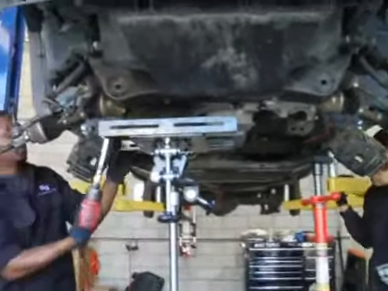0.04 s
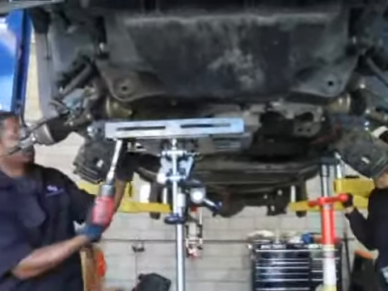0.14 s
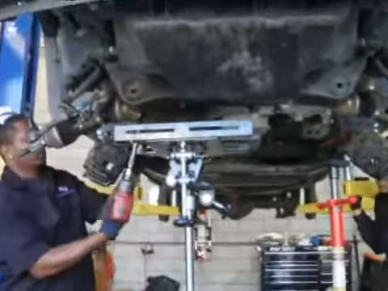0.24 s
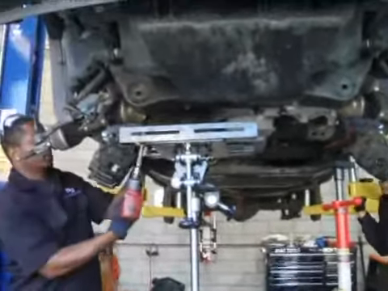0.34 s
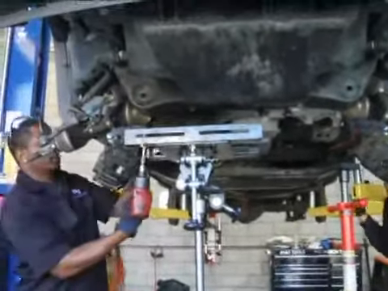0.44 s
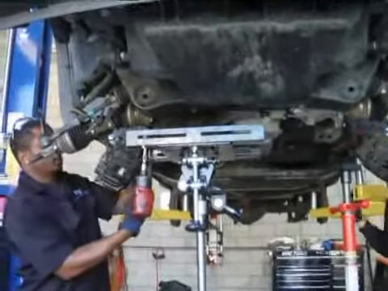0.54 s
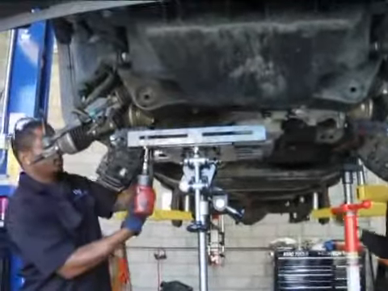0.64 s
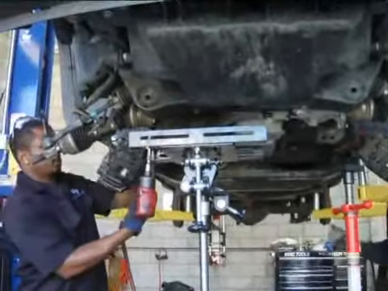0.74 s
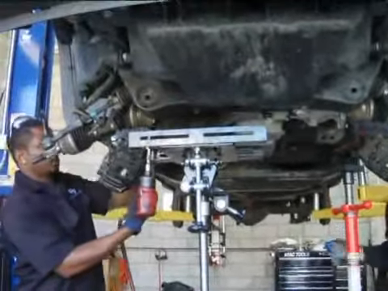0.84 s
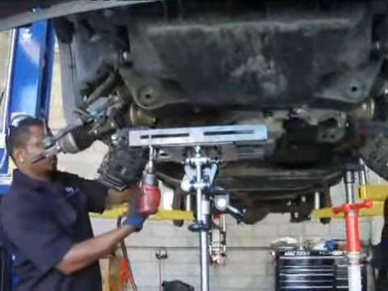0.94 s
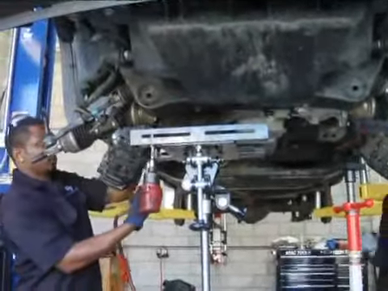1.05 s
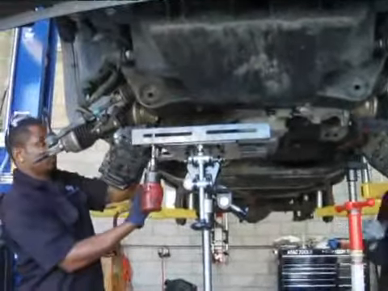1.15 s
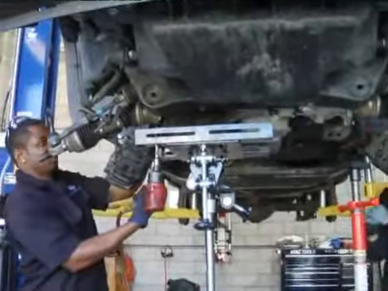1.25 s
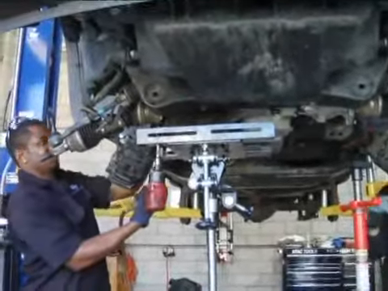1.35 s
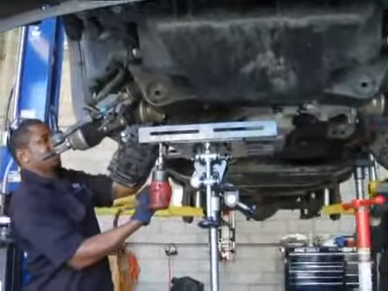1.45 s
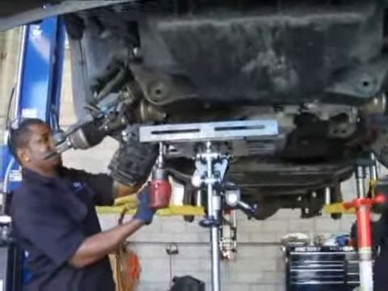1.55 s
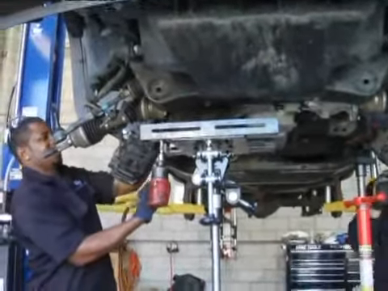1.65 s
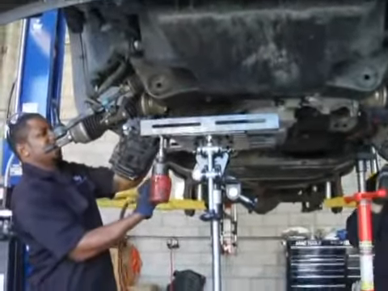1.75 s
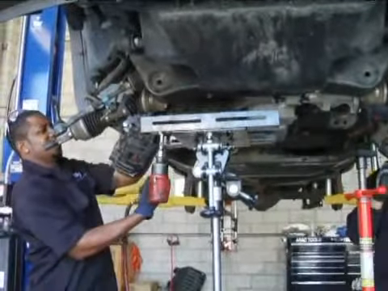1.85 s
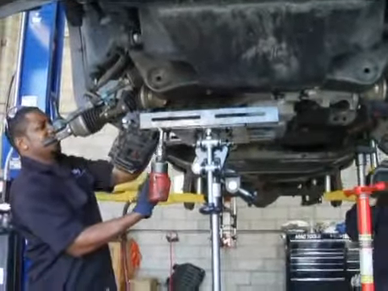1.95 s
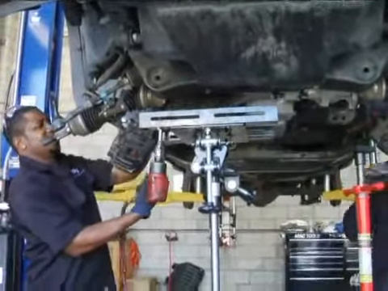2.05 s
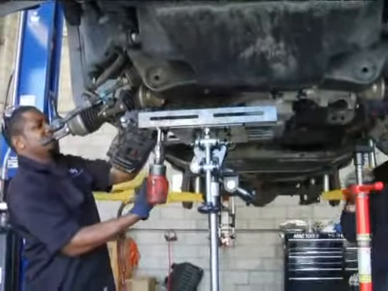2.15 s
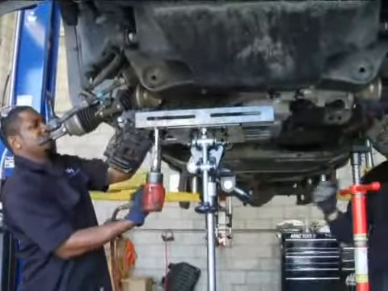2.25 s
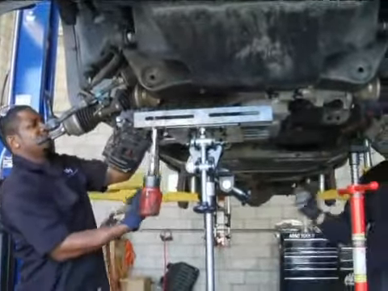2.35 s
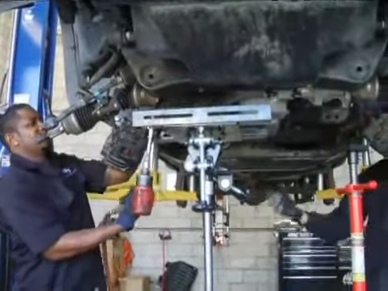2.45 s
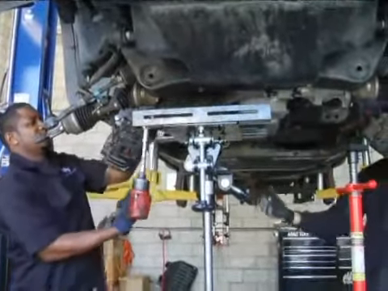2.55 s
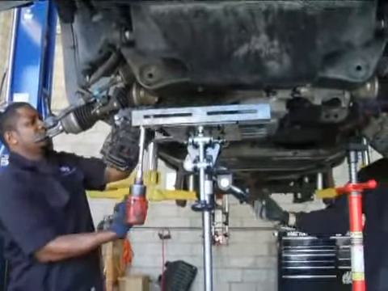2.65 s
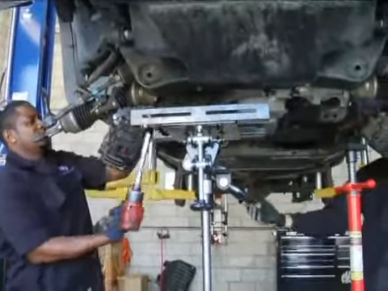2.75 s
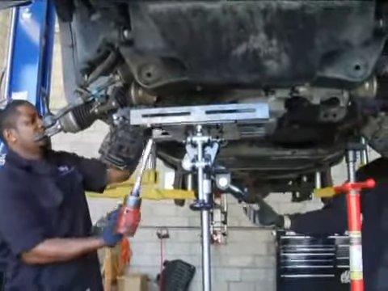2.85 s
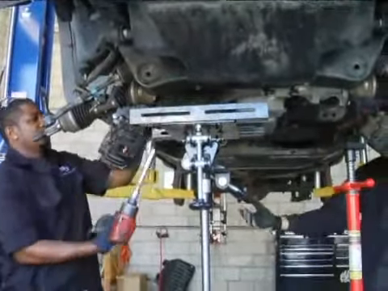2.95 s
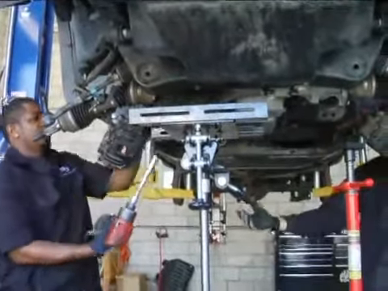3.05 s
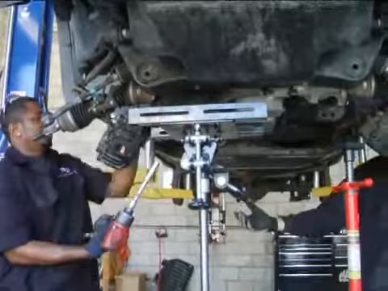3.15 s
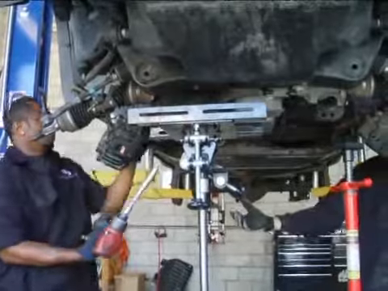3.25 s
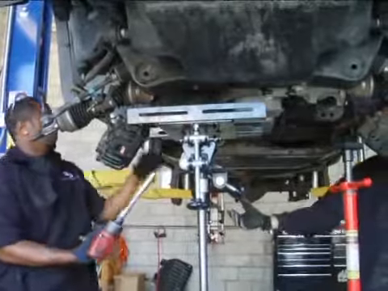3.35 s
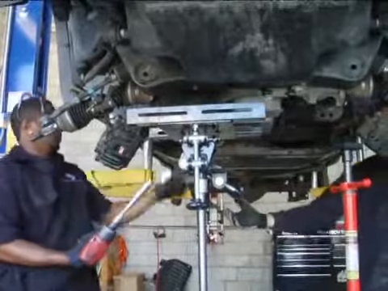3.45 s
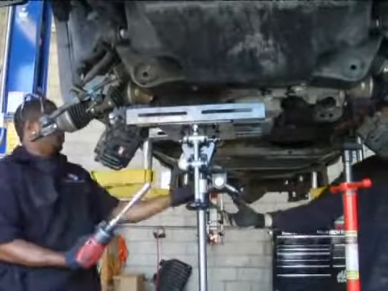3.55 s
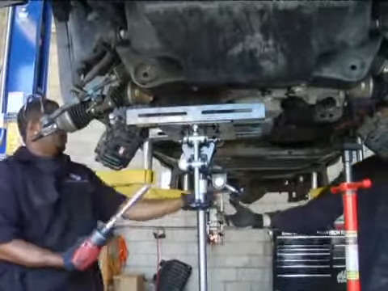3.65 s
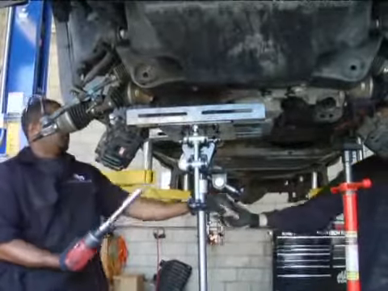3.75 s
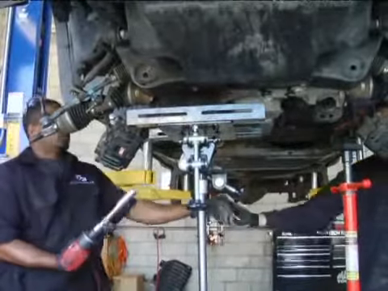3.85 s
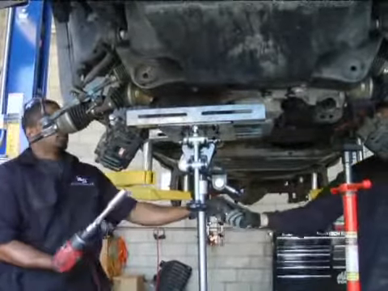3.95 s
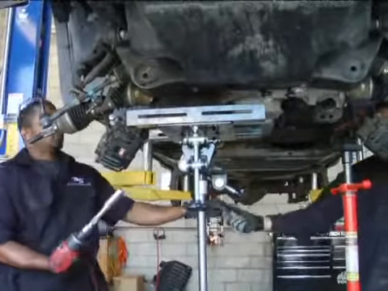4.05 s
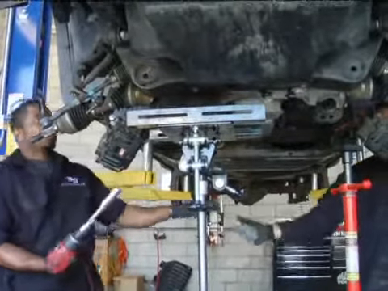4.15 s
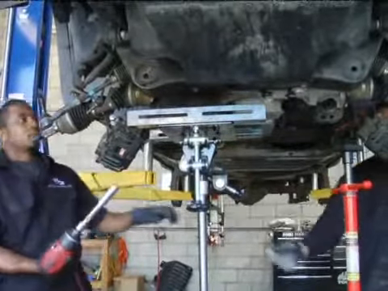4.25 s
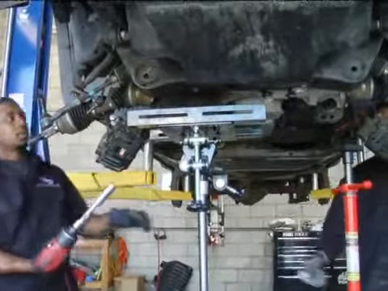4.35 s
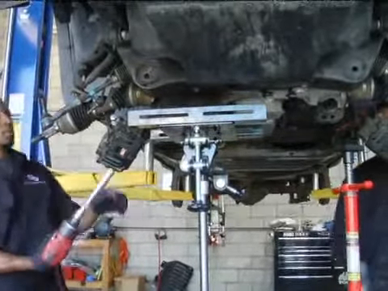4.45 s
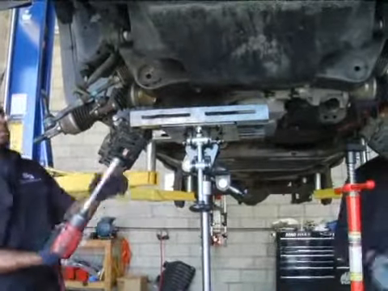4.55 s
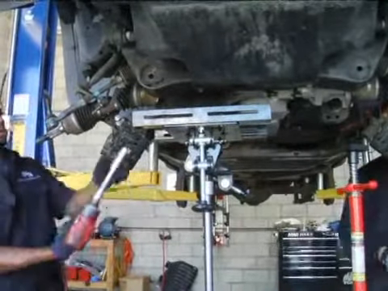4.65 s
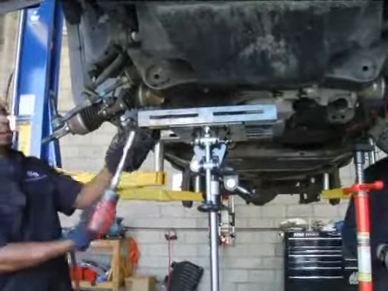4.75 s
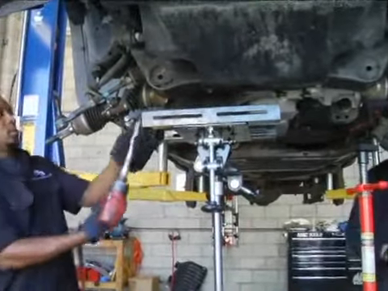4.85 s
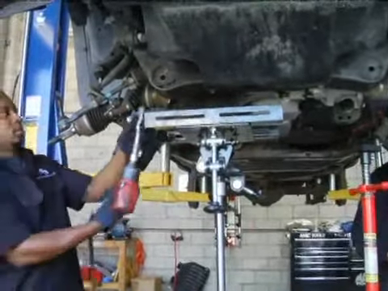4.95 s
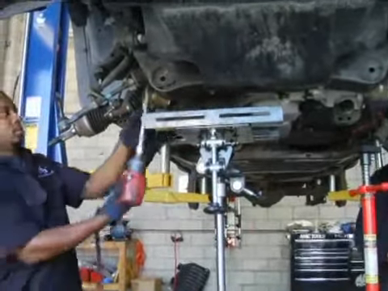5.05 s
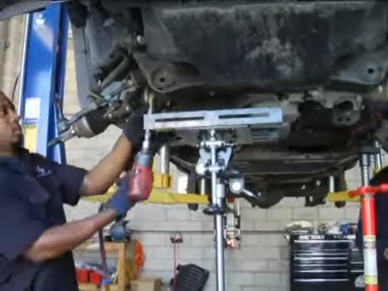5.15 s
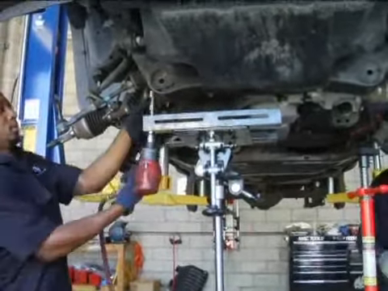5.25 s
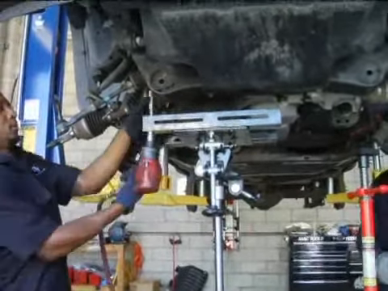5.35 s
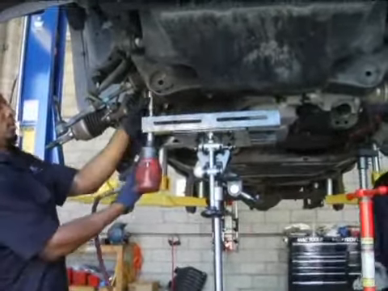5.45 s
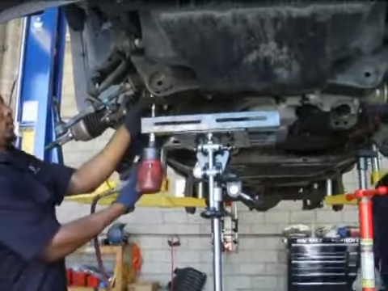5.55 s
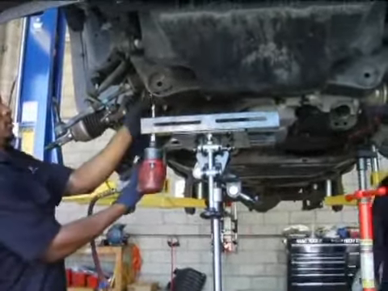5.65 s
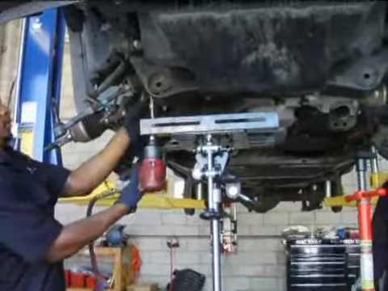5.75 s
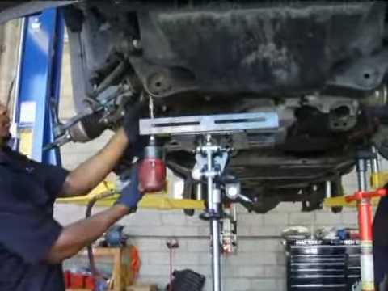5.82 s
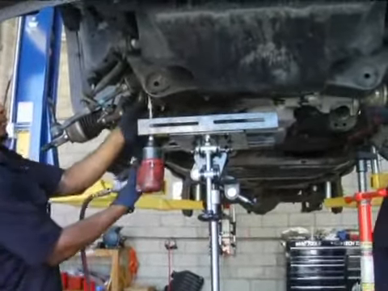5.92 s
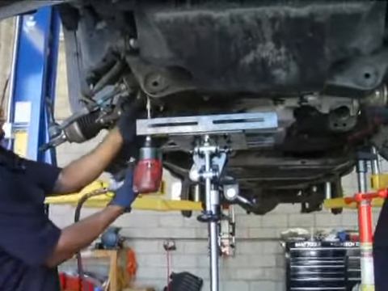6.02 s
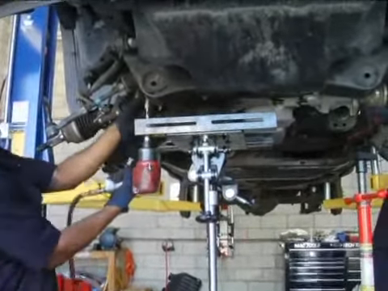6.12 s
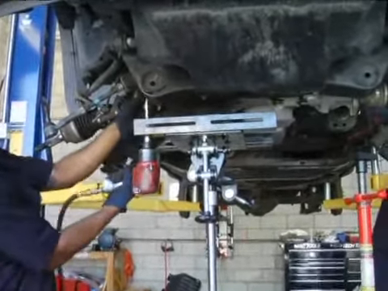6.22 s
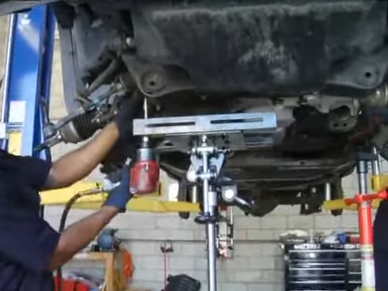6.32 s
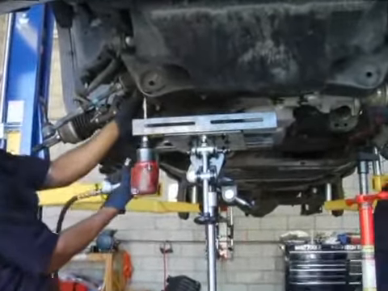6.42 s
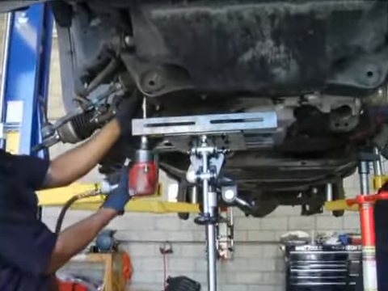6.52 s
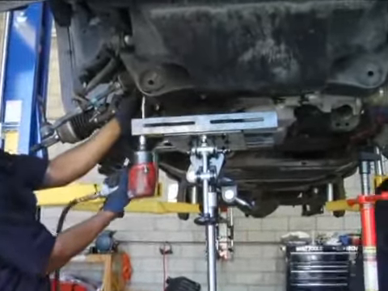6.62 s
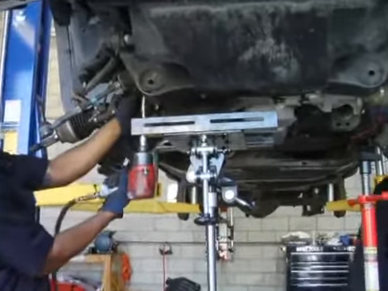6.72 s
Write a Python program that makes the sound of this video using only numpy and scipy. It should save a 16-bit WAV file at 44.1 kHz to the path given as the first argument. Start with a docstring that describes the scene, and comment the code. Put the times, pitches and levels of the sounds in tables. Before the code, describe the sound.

Over low fan hum in a brick workshop, knocks and rustling lead to an air impact wrench bursting, a ringing socket, then more bursts.

```python
"""Fans hum over a low rumble in a brick workshop, with knocks and rustling hands, before an air impact wrench
bursts in under a lifted car; after a pause full of knocks and rings it bursts in again.
The vane motor is a train of puffs with throbbing hiss and clatter; it stalls on hammer blows, and once spins
free and coasts down. Noise bursts and modes make the knocks, paired sines the ringing socket, gritty noise
the rustle. Echo tails place it all in a hall; the sound is practically mono."""
import sys
import numpy as np
from scipy import signal
from scipy.io import wavfile
from scipy.ndimage import uniform_filter1d

SR = 44100
rng = np.random.default_rng(int(sys.argv[2]) if len(sys.argv) > 2 else 0)


def output_pcm(signal):
    """Save a mono or channel-first signal as 16-bit PCM at the path in sys.argv[1].

    Samples are clipped to [-1, 1] before scaling.
    """
    pcm = np.clip(np.atleast_2d(signal).T, -1, 1) * 32767
    wavfile.write(sys.argv[1], SR, np.round(pcm).astype(np.int16))


N = 298998

# the bolt is loose and the rotor turns evenly:
# time_s, vanes passing the exhaust_hz, puff_db, ring of the exhaust passage_db
FREE_RUN = [(1.715, 346.7, -34, -38), (1.733, 401.6, -24.5, -21), (1.763, 496, -28, -48),
            (1.795, 542, -28, -25), (1.81, 495.4, -31, -42), (1.826, 451, -23, -30),
            (1.852, 384.5, -30, -35), (1.894, 286.8, -39, -30.5), (2.008, 155.4, -36, -49),
            (2.04, 141.5, -40, -36), (2.092, 115.1, -38.5, -37), (2.152, 98.16, -37.5, -50),
            (2.25, 66.3, -47.5, -51)]
# pulls of the trigger: touched_s, wide open_s, let go_s, end of coasting_s, hiss_db, hiss sag while held_db,
# hiss after letting go_db, clatter_db, clatter coasting_db, rumble_db, fade while coasting_db
TRIGGER_PULLS = [(1.356, 1.399, 1.545, 1.675, -25, -4, -32.5, -28, -33, -29.5, -5),
                 (1.643, 1.675, 1.81, 2.19, -28, -6.5, -42.5, -31, -33.5, -37, -7),
                 (6.09, 6.137, 6.26, 6.39, -22, -6.5, -33, -29, -31.5, -36, -5),
                 (6.374, 6.382, 6.51, 6.64, -29, -1, -34, -32, -29.5, -38, -9),
                 (6.573, 6.671, 6.8, 6.9, -31, 1.5, -31, -32, -28, -49, -7)]
# treble spectrum of a hard impact: pitch_hz, level_db
CRACK_COLOUR = [(2500, -28), (4000, 8.5), (6000, 10.5), (9000, 7), (13000, 5)]
# how long the hall rings in each band: pitch_hz, t60_s
HALL_DECAY = [(100, .8), (500, .7), (1500, .6), (3000, .5), (5000, .32), (12000, .22)]


def amp(db):
    """dB to gain."""
    return 10 ** (np.asarray(db) / 20)


def evened(x):
    """Scales to rms 1."""
    return x / np.sqrt(np.mean(x ** 2) + 1e-20)


def read(points, hz):
    """Reads a spectrum on a log frequency axis."""
    f, value = np.transpose(points)
    return np.interp(np.log(hz + 1), np.log(f + 1), value)


def curve(tables, index, silent=-120):
    """Joins one column of several tables over the whole length; outside them it stays at silent."""
    t, out = np.arange(N) / SR, np.full(N, float(silent))
    for rows in map(np.array, tables):
        inside = (t >= rows[0, 0]) & (t <= rows[-1, 0])
        out[inside] = np.interp(t[inside], rows[:, 0], rows[:, index])
    return out


def level(tables, index):
    """A dB column as gain, with edges softened over 3 ms."""
    return uniform_filter1d(amp(curve(tables, index)), size=130)


def colour(x, points):
    """Causal filter with the given spectrum (minimum phase)."""
    hz = abs(np.fft.fftfreq(8192, 1 / SR))
    log_gain = np.log(amp(np.maximum(read(points, hz), -100)))
    min_phase = -signal.hilbert(log_gain).imag
    taps = np.fft.ifft(np.exp(log_gain + 1j * min_phase)).real[:4096]
    return signal.oaconvolve(x, taps)[:len(x)]


def resonate(x, hz, width_hz):
    """A two-pole resonance of gain 1."""
    r = np.exp(-np.pi * width_hz / SR)
    poles = [2, -4 * r * np.cos(2 * np.pi * hz / SR), 2 * r * r]
    return signal.lfilter([1 - r * r, 0, r * r - 1], poles, x)


def resonate_twice(x, hz, width_hz):
    """Two equal resonances in a row, for steeper skirts."""
    return resonate(resonate(x, hz, width_hz), hz, width_hz)


def noise():
    """White noise over the whole length."""
    return rng.standard_normal(N)


def grit(spread_db, per_s):
    """Noise sprinkled with small clicks of uneven size."""
    sizes = amp(spread_db * np.minimum(rng.exponential(1, N), 3.5))
    clicks = sizes * (rng.random(N) < per_s / SR)
    return noise() * (.5 + evened(clicks))


def add(mix, s, sound):
    """Lays a sound into the mix at s seconds."""
    part = mix[round(s * SR):][:len(sound)]
    part += sound[:len(part)]


def scatter(x, t60s, start):
    """Echoes as sparse taps of random sign, each band dying at its own speed; start is in samples."""
    taps, at = np.zeros(SR), np.arange(start, SR - 20, 20)
    taps[at + rng.integers(0, 20, len(at))] = rng.choice([-1., 1.], len(at))
    hz, t, z = signal.stft(taps, SR, nperseg=256)
    decay = amp(-60 * t / read(t60s, hz)[:, None])
    tail = signal.istft(z * decay, SR, nperseg=256)[1]
    return signal.fftconvolve(x, tail / np.linalg.norm(tail))[:N]


def hall(x):
    """Echo of the hall: three random tails cross-fade in turn, nine cycles a second, for an even reverberation."""
    turn = 2 * np.pi * np.arange(N) / SR * 9
    shares = [np.sqrt(2 / 3) * np.cos(turn + k * np.pi / 3) for k in range(3)]
    return sum(scatter(x * share, HALL_DECAY, start=400) for share in shares)


def air():
    """Gains of hiss, clatter and shudder: valve opens, pressure sags, trigger let go, the coasting air dies away."""
    opening_db, let_go_s = -46.5, 0.0039  # start of the rise, time of the fall at letting go
    die_away_s, die_away_db = 0.075, -24  # fall after coasting
    shudder_db_per_s = -64  # the tool shakes the stand, less and less through a pull
    t, out = np.arange(N) / SR, np.zeros((3, N))
    for (touched, opened, let_go, coast_end, hiss_db, sag_db, after_db,
         clatter_db, coast_db, rumble_db, fade_db) in TRIGGER_PULLS:
        times = [touched, opened, let_go, let_go + let_go_s, coast_end, coast_end + die_away_s]

        def follow(open_db, held_db, released_db):
            coasted_db = released_db + fade_db
            points = [open_db + opening_db, open_db, held_db, released_db, coasted_db, coasted_db + die_away_db]
            return np.interp(t, times, points, -120, -120)

        hiss = follow(hiss_db, hiss_db + sag_db, after_db)
        clatter = follow(clatter_db, clatter_db, coast_db)
        held_rumble_db = rumble_db + shudder_db_per_s * (let_go - opened)
        shudder = np.interp(t, times[:4], [-120, rumble_db, held_rumble_db, -120])
        out = np.maximum(out, amp([hiss, clatter, shudder]))
    return out


def workshop():
    """Ventilation noise, wavering fan tones and a low rumble that swells when the tool shakes the stand."""
    # spectrum of the ventilation: pitch_hz, level_db
    vent_colour = [(8.8, -40), (15, -35), (36, -2), (60, -13.5), (103, -8), (149, -13), (186, -5.5),
                   (301, -15), (704, -20.5), (767, -22.5), (1140, -23), (1650, -31.5), (4690, -43),
                   (11900, -44), (13000, -57)]
    # fan tones: pitch_hz, width_hz, level_db
    fan_tones = [(86.6, 2.3, -60.5), (116, 6, -56), (184.14, 6.2, -49.5), (426, 5, -66),
                 (495.4, 6.1, -62.5), (710, 22, -58.5)]
    # low rumble of the hall: time_s, level_db
    rumble_level = [(0.0, -46.5), (0.34, -55), (1.19, -44.5), (1.26, -60), (2.21, -72), (2.79, -57),
                    (4.6, -79), (5.36, -52), (5.91, -50), (6.04, -77), (6.78, -62)]
    vents = amp(-48.5) * evened(colour(noise(), vent_colour))
    hum = sum(amp(db) * evened(resonate(noise(), f, w)) for f, w, db in fan_tones)
    rumble = evened(resonate_twice(noise(), 69, 62))
    shudder_gain = air()[2]
    return vents + hum + (amp(curve([rumble_level], index=1)) + shudder_gain) * rumble


def rustle():
    """Gritty friction of steel below, a soft swish of glove cloth above; each move sets in fast and fades."""
    # hand moves: peak_s, scrape_db, swish_db, fade_db_per_s
    moves = [(.186, -60.5, -59.5, -54), (.32, -52, -66, -94), (0.618, -66, -48.5, -400),
             (0.903, -48, -47.5, -240), (1.001, -32, -39, -230), (1.066, -34.5, -42.5, -110),
             (2.2, -36.5, -53, -46), (2.342, -38, -44, -130), (2.616, -34.5, -46, -270),
             (2.664, -47, -55, -39), (4.622, -50.5, -43.5, -160), (4.7, -50.5, -54.5, -69),
             (5.19, -45, -57.5, -170), (5.714, -42.5, -58, -200), (5.754, -40.5, -53, -140)]
    # spectrum of sliding steel: pitch_hz, level_db
    steel_colour = [(300, 10), (1000, 6.5), (2500, 3), (4000, -7), (6500, -54)]
    # spectrum of rubbing cloth: pitch_hz, level_db
    cloth_colour = [(2500, -14), (4500, 6.5), (6500, 9), (8000, -9), (11000, -0.5), (13000, -61)]
    grab_db_per_s = 816  # how fast a move sets in
    scrape, swish = grit(3, 3000), grit(2, 4000)
    s, scrape_db, swish_db, fade = np.transpose(moves)[:, :, None]
    since = np.arange(N) / SR - s
    shape_db = np.where(since < 0, grab_db_per_s, fade) * since
    steel = amp((scrape_db + shape_db).max(0))  # the loudest move wins
    cloth = amp((swish_db + shape_db).max(0))
    return steel * evened(colour(scrape, steel_colour)) + cloth * evened(colour(swish, cloth_colour))


def socket():
    """A tapped steel socket: close pairs of ring modes beat as they die, until a glove all but stops them."""
    # taps: start_s, level_db, upper modes_db, extra for the top mode_db,
    # damping by the glove_db_per_s (above 0 counts as none), gripped after_s
    taps = [(2.3444, -40, -8, -5, -100, 0.023), (2.614, -55.5, 6.5, 0, -50, 0.011),
            (2.6664, -34.5, -6.5, -13, -58, 0.08), (2.7715, -35.5, -11, -12, -96, 0.057),
            (2.937, -43, -24, -5, -200, 0.093), (3.012, -60, -20, -2, 5, 0.025),
            (4.6074, -33, -16, 4, -7, .5), (4.6204, -21, -8.5, -0.5, 2, 0.73),
            (4.994, -57.5, -25, 0, -8, 0.089), (5.0694, -50.5, -22, -3, -5, 0.047)]
    # ring modes: pitch_hz
    mode_hz = [3427, 3444, 8905, 9042]
    # strength of each ring mode: level_db, t60_s
    mode_decay = [(2, 0.44), (-21, 1.1), (3.5, 0.41), (11, 0.2)]
    clank_db, clank_t60_s, clank_width_hz = -5.5, 0.036, 100  # a short rough clank around the lowest mode
    out, t = np.zeros(N), np.arange(SR) / SR
    ticks = rng.standard_normal((len(taps), len(t)))
    rise = 1 - .5 * np.exp(-t / 0.000094) - .5 * np.exp(-t / 0.0049)
    for (s, db, upper_db, top_db, damping, free), tick in zip(taps, ticks):
        ring = np.zeros(len(t))
        for f, (d, t60) in zip(mode_hz, mode_decay):
            mode_db = d + upper_db * (f > 5000) + top_db * (f > 9000)
            ring += amp(mode_db - 60 * t / t60) * np.sin(2 * np.pi * f * t)
        grip = amp(min(damping, 0) * t) * amp(-60 * np.maximum(t - free, 0) / 0.031)
        ring *= (amp(-34.0) + grip) * rise  # a faint ring outlives the grip
        clank = evened(resonate(tick, mode_hz[0], clank_width_hz))
        ring += amp(clank_db - 60 * t / clank_t60_s) * clank
        crack = amp(-10.0 - 60 * t / 0.015) * colour(tick, CRACK_COLOUR)
        add(out, s, amp(db) * (ring + crack))
    return out


def knocks(table):
    """A sharp contact and a short chatter shake the chassis, ring one spot of it and crack in the treble."""
    # spectrum of the shaken chassis: pitch_hz, level_db
    chassis_colour = [(120, -31), (250, -8.5), (700, 4), (1000, -0.5), (1600, -2.5), (2500, -6),
                      (3100, -8.5), (3800, -28.5), (6000, -48)]
    # modes of chassis and stand: pitch_hz, level_db, t60_s
    stand_modes = [(730, -15, 0.099), (1140, -27, 0.047), (1490, -12, 0.1), (1575, -9, 0.099),
                   (1850, -3, 0.14), (2010, -5, 0.11), (2130, -2, 0.2), (2560, -2, 0.12), (2740, -8, .06),
                   (3030, -4, 0.13)]
    stand_db, reach_octaves = -11, 0.33  # a knock wakes the modes near the spot it hits
    contact_db, contact_s = -7.5, 0.001535  # level and delay of the first hard touch
    out, t = np.zeros(N), np.arange(12000) / SR
    rise = 1 - np.exp(-t / .001)
    noises = rng.standard_normal((len(table), 3, len(t)))
    for (s, db, treble_db, hz, t60, ring_db, hold), (a, b, c) in zip(table, noises):
        fall = amp(-60 * np.maximum(t - hold, 0) / max(t60, .01)) * rise
        spot = resonate_twice(a, hz, .35 * hz + 60)
        body = evened(colour(a, chassis_colour)) + amp(ring_db) * evened(spot)
        # same energy for the same blow
        body *= fall / np.sqrt(np.mean((body * fall) ** 2) / np.mean(fall ** 2))
        touch = resonate(np.exp(-t / 0.00005), hz, hz) + np.exp(-t / .0001)
        touch = colour(touch, chassis_colour)
        touch = np.roll(touch / abs(touch).max(), round(contact_s * SR))
        body += amp(contact_db) * touch
        # the car body rings on
        panels = amp(-14.0 - 60 * t / 0.23) * rise * evened(colour(c, chassis_colour))
        for (f, d, ring_s), luck in zip(stand_modes, c):
            distance = np.log2(f / hz) / reach_octaves
            mode_gain = amp(stand_db + d - 7 * distance ** 2 - 60 * t / ring_s) * np.tanh(luck)
            panels += rise * mode_gain * np.sin(2 * np.pi * f * t)
        crack = fall * amp(treble_db - 60 * t / 0.058) * evened(colour(b, CRACK_COLOUR))
        add(out, s, amp(db) * (body + panels) + crack)
    return out


def rotor():
    """Speed, puff level and roughness: each spin-up runs to the next stall; after letting go the rotor coasts."""
    # spin-ups against the bolt: start_s, vanes passing at the start_hz, gain_hz_per_s, puff_db, roughness 0-1
    spin_ups = [(1.394, 174.4, 2211, -8.5, 0.27), (1.445, 121.8, 2771, -14, 0.31),
                (1.497, 130, 1799, -17.5, 0.13), (1.665, 145.8, 3742, -9, 0.32),
                (6.135, 168.7, 2814, -13, 0.3), (6.195, 171.5, 2823, -17, 0.31),
                (6.24, 132.5, 2972, -11, .2), (6.385, 174.1, 2201, -12, 0.34),
                (6.439, 200.9, 1429, -17.5, 0.22), (6.64, 166.7, 1480, -18.5, 0.09)]
    loaded_top_hz = 328.3
    catch_s, catch_db, puff_sag_db = 0.029, -13, -11.5  # after a stall the puffs catch, then sag
    drag_per_s, coast_puff_db = 4.1, -37  # a loaded rotor coasting down
    stops = [row[0] for row in spin_ups + TRIGGER_PULLS]
    stops = sorted(stops + [row[2] for row in TRIGGER_PULLS] + [FREE_RUN[0][0]])
    tables = []
    for s, hz, gain_hz, db, rough in spin_ups:
        end = min(stop for stop in stops if stop > s)
        t = np.arange(s, end, 1 / 500)
        speed = np.minimum(hz + gain_hz * (t - s), loaded_top_hz)
        catch = catch_db * np.maximum(1 - (t - s) / catch_s, 0)
        puff_db = db + catch + puff_sag_db * (t - s) / (end - s)
        tables.append(np.transpose([t, speed, puff_db, rough + 0 * t]))
        for pull in TRIGGER_PULLS:
            if pull[2] == end:  # the trigger is let go
                t = np.arange(end, pull[3], 1 / 500)
                coast = speed[-1] * np.exp(-drag_per_s * (t - end))
                # placed first, so that later spin-ups override the coasting
                tables.insert(0, np.transpose([t, coast, coast_puff_db + 0 * t, rough + 0 * t]))
    return tables


def wrench():
    """Each vane lets out a puff; hiss and clatter throb with it, and a loaded rotor turns unevenly."""
    # spectrum of a puff: pitch_hz, level_db
    muffler_colour = [(60, -29.5), (150, 6), (300, 4.5), (480, 7), (700, 6.5), (1000, -3.5), (1350, -8),
                      (1700, -4), (2500, -21.5), (4000, -20.5), (8000, -39)]
    # spectrum of the air hiss: pitch_hz, level_db
    hiss_colour = [(1470, -26), (2500, 2), (4080, -13), (4750, -2), (5800, -2), (6090, -2), (9080, -1.5),
                   (10300, 0), (12000, -8.5), (12700, -19), (13000, -65)]
    # resonances of the tool case: pitch_hz, half the width of each stage_hz, level_db
    case_modes = [(1036, 61, 2), (1368, 110, 5.5), (1600, 94, 3), (1890, 270, 1), (2280, 76, -20),
                  (2850, 440, -10.5), (3250, 790, -0.5)]
    # pure tones of the free rotor: multiple of the vane rate, level against its puffs_db
    whine_tones = [(1, 1), (2, -2), (3, -4.5), (4, -24)]
    # loose vanes tick while the free rotor coasts: from_s, to_s
    ticking_s = (1.845, 2.14)
    ticks_db, free_rough = -48, 0.0463
    spins, (hiss_gain, clatter_gain, _) = rotor(), air()
    hz = curve(spins + [FREE_RUN], index=1, silent=200)
    rough = np.clip(curve(spins, index=3, silent=free_rough), 0, 1)
    wobble = evened(uniform_filter1d(noise(), size=200))
    turns = np.cumsum(hz * (1 + .3 * rough * wobble)) / SR  # counts vanes passing
    vane = (turns + .5).astype(int)
    strength = amp(8.2 * rough * rng.standard_normal(vane[-1] + 1)[vane])  # vanes seal unevenly
    harmonics = sum(np.cos(2 * np.pi * k * turns) * (k * hz < 4000) for k in range(1, 25))
    pulses = strength * np.sqrt(hz) * harmonics
    throb = np.exp(-(turns % 1) / 4.5) * strength

    gusts = evened(colour(throb * noise(), muffler_colour))
    puffs = evened(colour(pulses, muffler_colour))
    puffs = (1 - rough) * puffs + rough * gusts
    hiss = evened(colour((1 + 1.1 * throb) * noise(), hiss_colour))
    shaking = (1 + 2.2 * throb) * grit(3, 2000)
    clatter = evened(sum(amp(db) * evened(resonate_twice(shaking, f, 2 * w)) for f, w, db in case_modes))
    ticks = np.exp(-(turns % 1) / .08) * grit(3, 2000)
    ticks = evened(resonate_twice(ticks, 9300, 900))
    whine = sum(amp(db) * np.cos(2 * np.pi * round(k) * turns) for k, db in whine_tones)
    pipe = evened(resonate_twice(pulses, 1385, 130))  # the exhaust passage rings

    motor = level(spins + [FREE_RUN], index=2) * puffs
    motor += level([[(s, ticks_db) for s in ticking_s]], index=1) * ticks
    motor += level([FREE_RUN], index=2) * whine + level([FREE_RUN], index=3) * pipe
    return -motor + hiss_gain * hiss + clatter_gain * clatter


def scene():
    """Near sounds with their echo from the hall; the sound is practically mono."""
    # knocks on chassis and stand: start_s, level_db, treble_db, strongest ring_hz, length as t60_s, ring_db
    stand_knocks = [(0.178, -52, -52, 732, 0.076, -6), (0.314, -43.5, -53, 476, 0.18, 19),
                    (0.62, -38.5, -37, 830, 0.2, -14), (0.859, -49, -49, 415, 0.062, -8),
                    (1.104, -30.5, -59, 1850, 0.16, 0), (1.365, -25, -53, 400, 0.024, 23),
                    (1.568, -28, -27, 1305, 0.27, -20), (1.964, -31.5, -34, 1976, 0.11, -7),
                    (2.11, -30.5, -42, 3030, 0.11, 1), (2.165, -26.5, -51, 2950, 0.046, 8),
                    (2.175, -32.5, -34.5, 1672, 0.12, -8), (2.348, -31, -50, 2815, 0.064, 18),
                    (2.378, -35.5, -37, 1380, 0.12, 2), (2.513, -40, -39, 485, 0.07, -3),
                    (2.588, -42, -49, 1380, 0.24, 16), (2.6, -36, -43, 1600, .1, 26),
                    (2.608, -41, -47, 3300, 0.091, 20), (2.619, -39, -43, 2730, 0.11, 15),
                    (2.772, -43, -54, 1800, 0.024, -7), (3.12, -50, -50, 425, 0.18, 11),
                    (4.1732, -48, -71, 2820, 0.038, 3), (4.71, -39, -66, 443, 0.14, 3),
                    (5.155, -35, -58, 407, 0.077, 28), (5.194, -42, -55, 1750, 0.041, 0),
                    (5.402, -16.5, -56, 1810, 0.023, 17), (5.532, -46.5, -51, 710, 0.13, -29),
                    (5.706, -45, -49.5, 1670, 0.36, 16), (5.742, -34.5, -65, 1000, 0.17, 33),
                    (5.771, -31.5, -64, 1430, 0.056, 2), (6.104, -31.5, -41, 1347, 0.077, 1),
                    (6.286, -21.5, -21.5, 1554, 0.17, -4.5), (6.43, -20, -14.5, 1830, 0.063, 23),
                    (6.567, -21, -17, 1991, 0.05, 5)]
    # the socket chatters on a bolt head, then seats: the same columns, then chatters for_s
    bolt_chatters = [(0.648, -34, -40.5, 1410, 0.097, -8, 0.016), (0.891, -24, -34, 1440, 0.048, 4, 0.021),
                     (0.997, -37.5, -46, 1230, 0.089, -17, 0.016),
                     (1.062, -31, -32.5, 1060, 0.061, -3.5, 0.017),
                     (2.336, -26, -46, 2620, 0.015, 1.5, 0.008), (2.353, -30, -28, 890, 0.043, 2, .014),
                     (2.613, -32, -32, 1390, 0.06, 21, 0.019), (2.636, -41, -58, 680, 0.053, 14, 0.04)]
    # the hammer strikes the anvil: start_s, level_db, treble_db, strongest ring_hz
    hammer_blows = [(1.398, -16, -18.5, 189), (1.444, -21, -19, 190), (1.491, -18.5, -21, 467),
                    (1.667, -19, -25, 188), (6.132, -25.5, -16.5, 487), (6.158, -15, -32, 481.6),
                    (6.199, -17.5, -30, 216.4), (6.24, -23, -20, 121.2), (6.388, -22.5, -32, 570),
                    (6.417, -19, -21, 459.4), (6.487, -20, -30, 386), (6.643, -24.5, -28, 466),
                    (6.688, -22.5, -35, 500)]
    # faint level of side against mid: pitch_hz, level_db
    side_colour = [(60, -37), (170, -44), (510, -42), (1480, -45.5), (4320, -25.5), (12600, -32)]
    blow_t60_s, blow_ring_db, blow_hold_s = 0.039, 8.5, 0.012
    wrench_echo_db, knock_echo_db, socket_echo_db = -12, -7.0, -17
    blows = knocks([row + (blow_t60_s, blow_ring_db, blow_hold_s) for row in hammer_blows])
    tool = wrench() + blows
    hits = knocks([row + (0,) for row in stand_knocks] + bolt_chatters)
    ring = socket()
    mid = workshop() + rustle() + ring + hits + tool
    mid += hall(amp(socket_echo_db) * ring) + hall(amp(knock_echo_db) * hits)
    mid += scatter(amp(wrench_echo_db) * tool, HALL_DECAY, start=400)
    side = colour(scatter(mid, [(100, 0.01), (10000, 0.036)], start=0), side_colour)
    return np.array([mid + side, mid - side])


def record(dry):
    """A steep linear-phase low-pass ends the treble near 12.9 kHz."""
    low_pass = signal.firwin(511, 12900, window=("kaiser", 9), fs=SR)
    return signal.oaconvolve(dry, low_pass[None], "same")


dry = scene()
out = record(dry)
output_pcm(out)
```